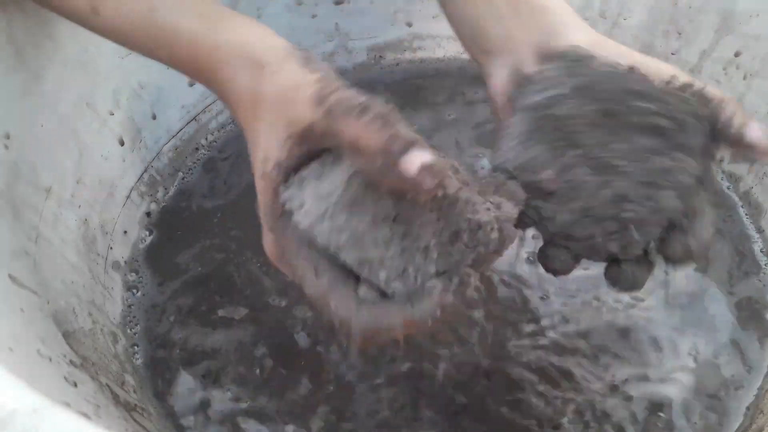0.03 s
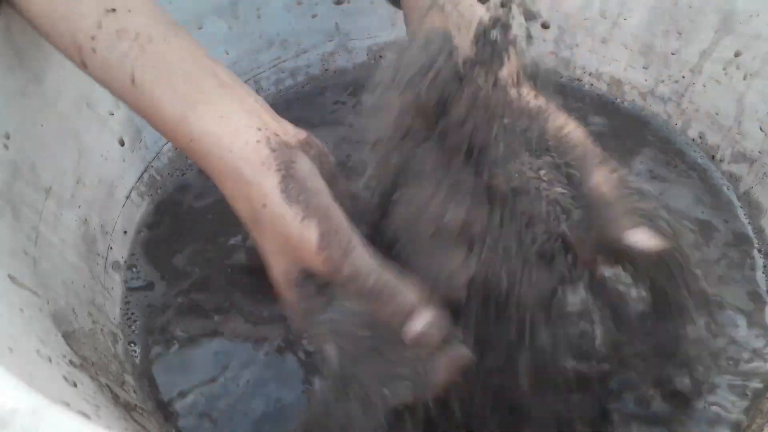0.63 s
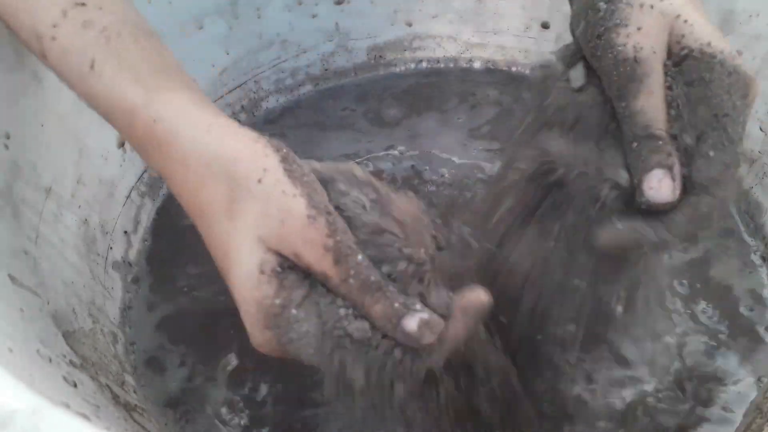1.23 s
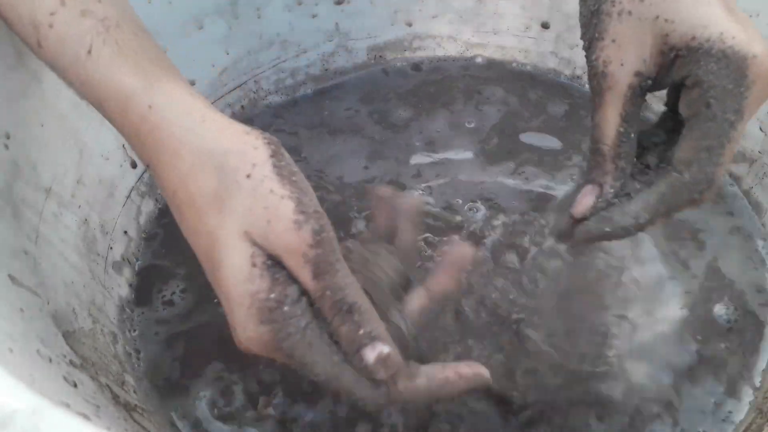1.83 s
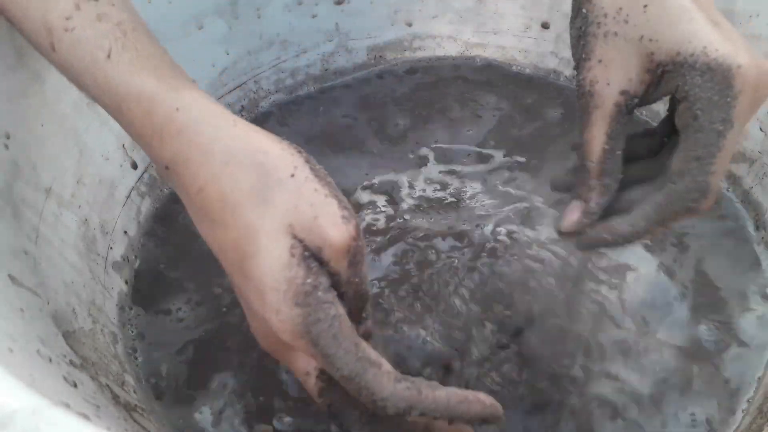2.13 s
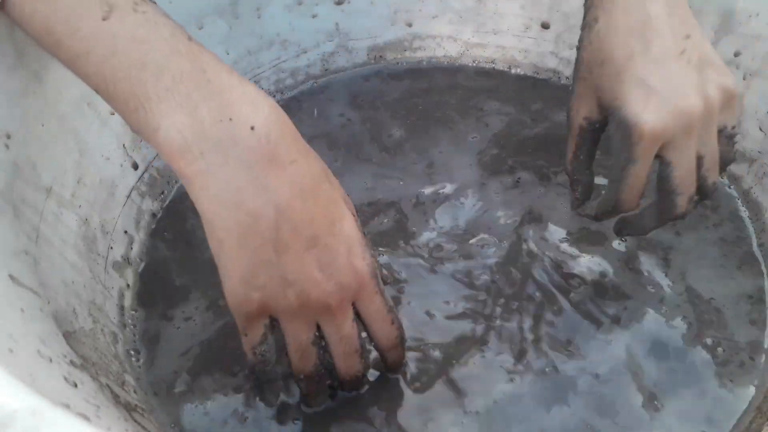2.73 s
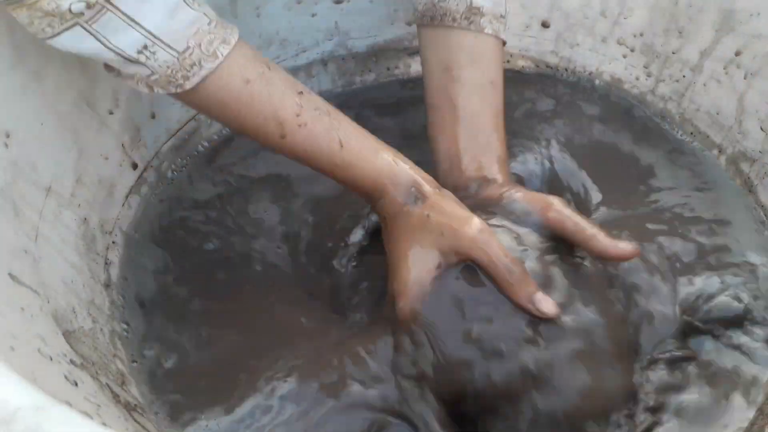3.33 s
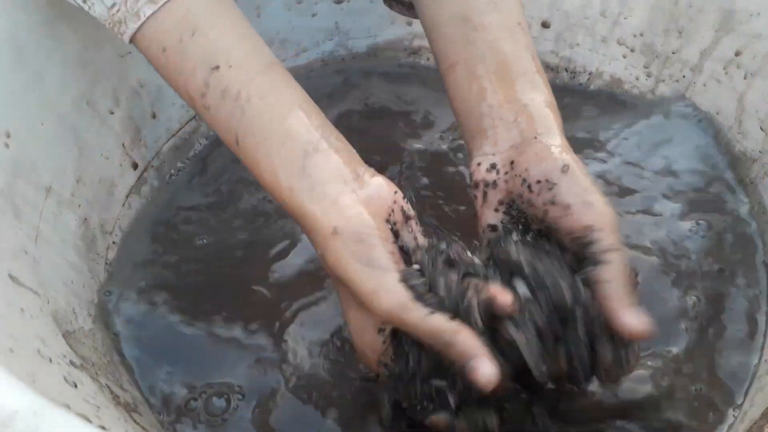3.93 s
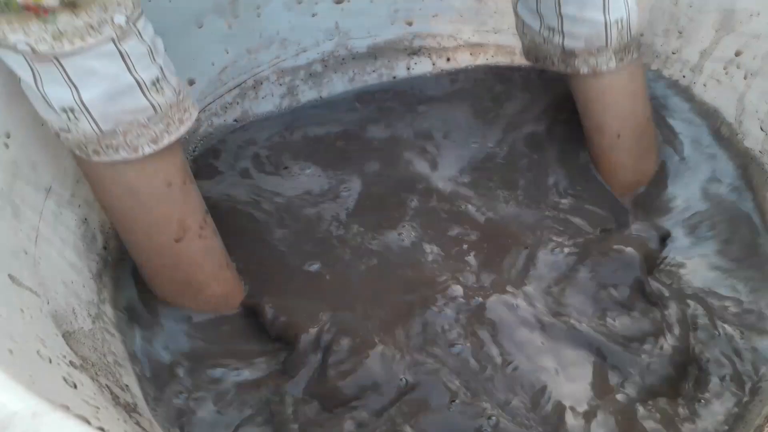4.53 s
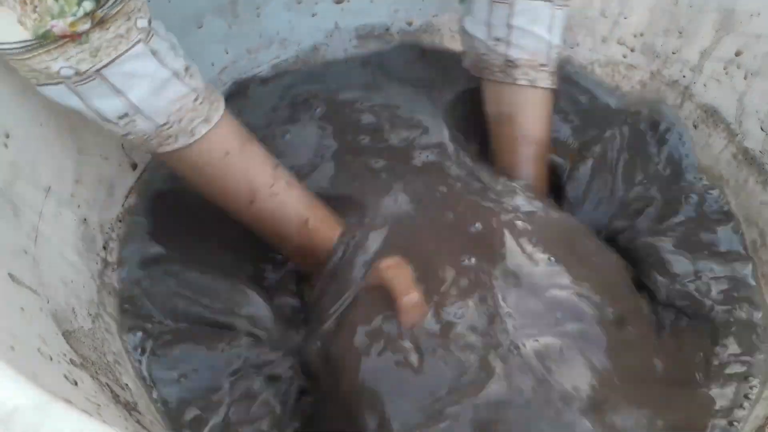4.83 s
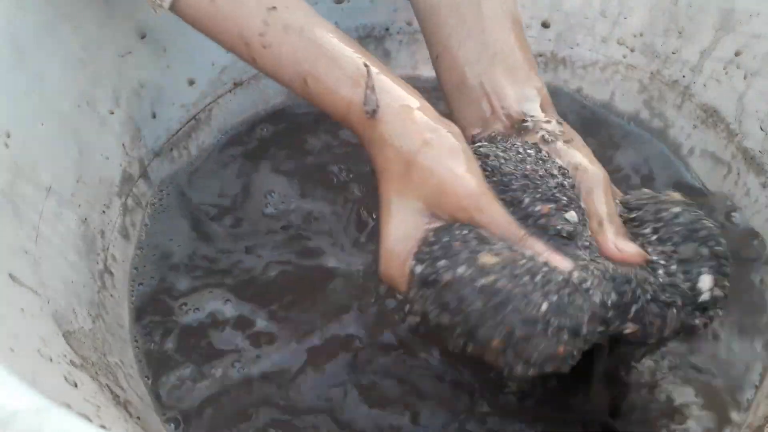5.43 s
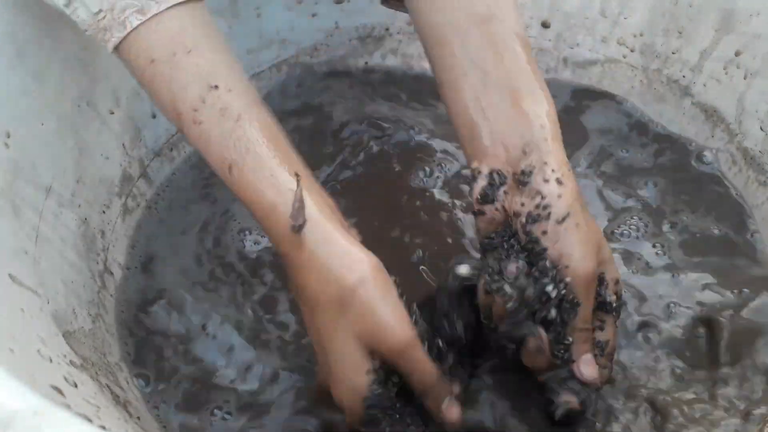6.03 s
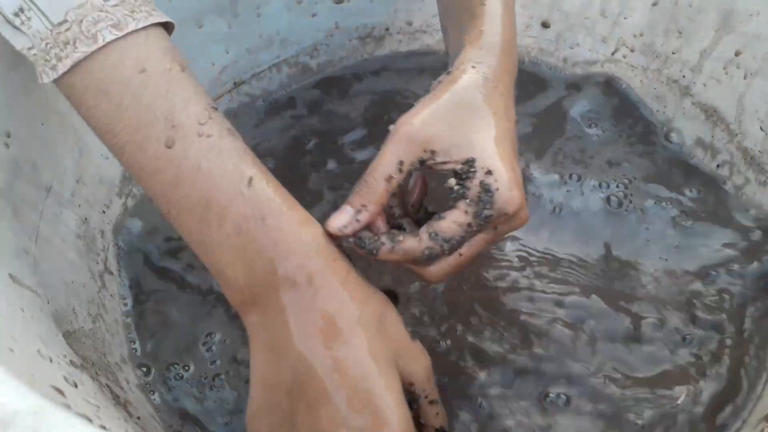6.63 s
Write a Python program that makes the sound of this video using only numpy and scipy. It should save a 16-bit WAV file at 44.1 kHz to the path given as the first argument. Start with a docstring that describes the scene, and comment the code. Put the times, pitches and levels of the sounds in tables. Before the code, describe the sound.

Close up, hands crumble sandy lumps over a tub of water, and the grit pours in with a hiss and a small splash. As the hiss fades, a small bird chirps faintly some way off. The hands then slosh through the water and lift out mud twice, squeezing it so it spits, squelches and drops back in plops. A low outdoor rumble lies underneath.

```python
"""A hiss of grit on water comes first, as hands crumble lumps of sandy ash over a tub.
The hands then scoop up the mud twice and squeeze it: it spits, squelches and drops back in plops
while the water sloshes. Hiss is the sum of many tiny impacts, a snap is a brief broadband impulse,
and a plop is the damped resonance of trapped air.
A small bird sings some way off, over a low outdoor rumble."""
import sys
import numpy as np
from scipy import signal
from scipy.fft import rfft, irfft, next_fast_len
from scipy.io import wavfile
from scipy.ndimage import uniform_filter1d

SR = 44100
rng = np.random.default_rng(int(sys.argv[2]) if len(sys.argv) > 2 else 0)


def store_pcm(level_fs):
    """Save levels as 16-bit WAV."""
    pcm = np.round(np.clip(level_fs, -1, 1) * 32767).astype(np.int16)
    wavfile.write(sys.argv[1], SR, np.atleast_2d(pcm).T)


N = 295029

# sand falling on the water: (time [s], level [dB])
SAND_POUR = [(0.0, -42.5), (0.2, -38), (0.33, -34.5), (0.47, -28.5), (0.66, -31.5), (1.27, -33.5),
             (1.96, -42), (2.3, -42.5), (2.42, -50.5), (2.8, -60)]
# cracking lumps and bursting pockets of mud:
# (time [s], relative crack level [dB], centre frequency [Hz], relative spray level [dB])
SNAPS = [(0.3039, -20, 6700, -28.5), (0.567, -6, 5430, -23.5), (0.6128, -17, 5260, -26.5),
         (0.6644, 6, 6100, -21), (0.8402, -4.5, 2500, -30), (0.868, -27, 5940, -30.5),
         (0.964, -22, 2380, -30), (1.128, -20, 6500, -24.5), (1.2402, -26, 2360, -32.5),
         (1.386, -14, 4900, -30.5), (1.6102, -29, 6130, -28.5), (1.8914, -32, 4740, -32.5),
         (2.1257, -3, 4200, -47), (2.1778, 4, 10900, -54), (2.264, -3.5, 13500, -33),
         (3.267, -21, 7550, -43), (3.418, -9, 2550, -35.5), (3.7718, 3, 6060, -28), (3.785, -8, 2400, -32),
         (3.7963, 12, 4600, -22), (3.8375, -2, 4730, -25.5), (3.8761, 16.5, 6100, -47),
         (3.878, 10, 5400, -46), (3.9037, -19, 4060, -26.5), (3.9436, -26, 3900, -21.5),
         (4.0422, -24, 3000, -31.5), (4.080, -25, 4300, -25.5), (4.1304, -9, 6900, -26.5),
         (4.1494, -1, 4570, -46), (4.158, -17, 4070, -32), (4.175, 9.5, 5140, -29),
         (4.2275, 11.5, 6100, -33), (4.2609, -4, 3660, -25), (4.304, -16, 3800, -29.5),
         (4.354, 0, 2320, -45), (4.3714, -5, 2270, -29), (4.402, 0.5, 4170, -26.5),
         (4.8742, -21, 4230, -30.5), (4.8925, -18, 3020, -32.5), (4.9697, -4.5, 6350, -48),
         (5.054, -9, 11000, -49), (5.0697, -11, 3900, -32), (5.146, -20, 2550, -26.5),
         (5.1538, -8, 3070, -28.5), (5.3619, -13, 2860, -42), (5.4555, -35, 3720, -35.5),
         (5.526, -1, 4740, -28), (5.5404, -8, 4680, -32), (5.5497, -6, 4000, -25.5),
         (5.603, -2, 2800, -20.5), (5.607, 1, 6060, -20.5), (5.6554, -3, 3840, -24.5),
         (5.666, 9, 3130, -19), (5.693, -10, 5530, -15.5), (5.7301, 7, 5340, -28),
         (5.7566, 14.5, 5650, -30), (5.7796, -15, 2960, -24), (5.8639, -2, 5200, -21),
         (5.9418, -12, 4530, -23), (6.0128, -27, 5150, -32), (6.19, -2.5, 4700, -45),
         (6.2286, -13, 3900, -25.5), (6.3064, -30, 7000, -36), (6.4055, -22, 5180, -39.5),
         (6.4972, -38, 2700, -45)]
# large air pockets ringing in the water: (time [s], frequency [Hz], relative level [dB])
PLOPS = [(0.443, 567, -16), (0.466, 1160, -20), (0.563, 2020, -21.5), (0.664, 557, -23), (0.84, 1126, -19),
         (0.872, 1140, -21), (0.96, 860, -24.5), (1.242, 830, -26.5), (1.653, 1600, -25.5),
         (2.334, 970, -31.5), (3.295, 2290, -28), (3.557, 865, -25.5), (3.666, 880, -29),
         (3.784, 2075, -10.5), (3.797, 507, -15.5), (3.924, 2730, -18), (3.93, 640, -22.5),
         (3.948, 524, -24), (3.984, 526, -22.5), (4.038, 895, -23.5), (4.081, 590, -22.5),
         (4.083, 3110, -19), (4.162, 820, -19.5), (4.226, 1280, -20), (4.258, 1390, -22.5),
         (4.354, 2580, -21), (4.37, 1770, -21.5), (4.888, 925, -24), (5.117, 534, -28), (5.196, 1950, -24),
         (5.232, 742, -23), (5.362, 2980, -18.5), (5.313, 1220, -28.5), (5.372, 1310, -28.5),
         (5.606, 570, -12.5), (5.665, 2290, -5.5), (5.667, 593, -17.5), (5.691, 580, -15),
         (5.723, 2000, -14.5), (5.733, 530, -22), (5.783, 673, -24), (5.801, 560, -19.5), (5.866, 527, -28),
         (5.915, 1360, -27), (5.93, 1520, -19.5), (5.942, 926, -21), (6.018, 530, -19),
         (6.075, 1910, -23.5), (6.314, 925, -35), (6.377, 1080, -32)]
# mud lifted out, squeezed and let back in: (time clear of the water [s], rise constant [s],
# time let back [s], decay constant [s], trickle level [dB], squeeze time [s], squeeze level [dB])
SCOOPS = [(3.74, 0.43, 4.38, 0.039, -38, 3.67, -37.5), (4.85, 0.16, 6.23, 0.11, -41.5, 5.67, -30)]
# wet grit forced between the fingers: (peak time [s], duration [s], level [dB])
SQUIRTS = [(3.654, 0.17, -45), (4.03, 0.13, -32), (4.317, 0.024, -27), (4.656, 0.33, -44.5),
           (4.883, 0.02, -30.5), (5.125, 0.055, -34.5), (5.723, 0.11, -28), (6.178, 0.044, -33.5)]
# hands pushing water about: (peak time [s], duration [s], relative level [dB])
HAND_STROKES = [(.3, .16, -41), (.72, 0.44, -38), (3.08, 1, -44), (3.85, 1, -50), (4.8, 0.85, -41.5),
                (5.2, 0.43, -44), (5.71, .22, -37), (6.12, .35, -51.5)]
# dull knocks: (time [s], frequency [Hz], envelope peak [dB])
BUMPS = [(1.124, 91.5, -19.5), (1.183, 278, -20.5), (1.257, 170, -21.5), (1.275, 310, -21.5),
         (1.568, 226, -22.5), (1.686, 115, -19.5), (2.22, 216, -24), (2.484, 130, -12), (2.732, 320, -17.5),
         (2.754, 320, -14.5), (2.835, 207, -23.5)]
# reflections from the tub's wall and the water surface: (delay [s], gain [ratio])
TUB_ECHOES = [(.0014, -0.076), (.0026, -0.13), (.0043, .16), (.0061, -0.0088)]
# the bird's thin glides:
# (time [s], duration [s], start frequency [Hz], end frequency [Hz], relative level [dB])
BIRD_WHISTLES = [(.035, .05, 6100, 5700, -35), (.135, .05, 5600, 5950, -34), (.23, .11, 4900, 5600, -33),
                 (.61, .07, 6500, 5750, -31), (.785, .06, 5200, 5900, -32), (.935, .06, 5300, 5750, -30),
                 (1.24, .07, 4150, 3850, -31), (1.40, .05, 3950, 3750, -32), (1.565, .06, 4100, 3800, -33),
                 (1.745, .055, 3750, 4150, -35), (1.835, .05, 5650, 5500, -35),
                 (2.66, .27, 6620, 7060, -49)]
# one down-slurred chirp: (time from onset [s], frequency [Hz], relative level [dB])
BIRD_CHIRP = [(0, 6300, -14), (.008, 6750, 2), (.016, 6300, 1), (.022, 5500, 1), (.032, 4850, -1),
              (.048, 4100, -11)]
# outdoor rumble, easing unevenly: (time [s], level [dB])
RUMBLE_LEVEL = [(0, -34.5), (1.2, -32.5), (2.2, -32), (3.0, -36.5), (3.6, -34), (4.45, -40), (5.2, -35.5),
                (5.7, -35), (6.1, -40), (6.69, -40)]
# spectral envelopes of the noise sources: (frequency [Hz], relative spectral density [dB])
SAND_SPECTRUM = [(710, -5), (1200, -9), (1270, -8.5), (2770, -4.5), (3850, -1), (5040, -2), (6510, 0),
                 (8330, -5), (9780, -19), (11400, -11.5), (15500, -14)]
MUD_SPECTRUM = [(880, -10), (1500, -1), (2260, -2), (2490, -1), (3250, 1.5), (5090, 3), (5720, 1.5),
                (7980, 1), (9510, -15), (14800, -6), (15500, -15)]
SQUIRT_SPECTRUM = [(2500, 0), (5000, 3.5), (7500, 8), (9500, -12.5), (13000, -0.5), (15500, -12)]
SLOSH_SPECTRUM = [(250, 6), (400, 2), (600, 4), (950, 2), (1500, -5), (2200, -6), (3500, -9)]
PLUNGE_SPECTRUM = [(200, 2), (350, -9), (600, -2.5), (1300, -5.5), (2000, -12), (3500, -10)]
RUMBLE_SPECTRUM = [(32, -19), (55, -41), (98, -1.5), (145, 2), (199, -8.5), (232, -9), (296, -14),
                   (337, -18.5), (431, -22.5), (520, -22), (680, -29.5), (1140, -120)]
BUFFET_SPECTRUM = [(20, -15), (35, -14), (55, 1.5), (75, 3.5), (110, 0.5)]
AIR_SPECTRUM = [(300, 21), (1000, -8), (3000, -47), (7500, 10), (9500, -18), (15500, -13)]


def sand():
    """Shot noise: independent impacts of dry grit on the water sum to a hiss."""
    grit = grains(per_s=1800, low_hz=1300, high_hz=14000, cycles=4, spread_db=5, clump_db=5)
    return level(SAND_POUR) * wash(grit, SAND_SPECTRUM, noise_db=.5)


def snaps(spray_rise_s=.0026, spray_fall_s=.0023):
    """Impulsive rupture: lumps and mud tear with a sizzle, crack for a millisecond and throw spray."""
    lower, highest, t = np.zeros(N), np.zeros(N), np.arange(-512, 1536) / SR
    times, pitches, levels = scatter(per_s=12, low_hz=2500, high_hz=10600, spread_db=3, sand_db=-8.5)
    small_snaps = np.column_stack([times, levels + 18, pitches, levels + 3])
    for s, crack_db, hz, spray_db in np.vstack([SNAPS, small_snaps]):
        noise, flutter = rng.standard_normal((2, len(t)))
        drops = rms_one(band(noise, .67 * hz, 1.297 * hz)) + from_db(-4) * noise
        crack = drops * burst(t, rise_s=.0003, fall_s=.0005)
        crack = 2 * crack / np.linalg.norm(crack)   # equal energy, peaking near 1
        unevenness = from_db(3 * np.tanh(rms_one(uniform_filter1d(flutter, size=50))))
        body = from_db(-2) * rms_one(resonate(noise, hz=1720, width_hz=3000))
        spray = 2 * (drops + body) * unevenness * burst(t, spray_rise_s, spray_fall_s)
        sound = from_db(crack_db - 10.5) * crack + from_db(spray_db - 6) * spray
        add(highest if hz > 9000 else lower, s + t[0], sound)
    return treble_shelf(lower) + highest


def plops(cycles_at_1khz=4.35, swell_cycles=.97, glide=-.062):
    """Damped resonance: air pockets ring briefly in muddy water, gliding as water slaps round them."""
    out, t = np.zeros(N), np.arange(4096) / SR
    times, pitches, levels = scatter(per_s=24, low_hz=552, high_hz=2800, spread_db=4.5, sand_db=-16.5)
    small_plops = np.column_stack([times, pitches, levels + 7])
    for s, hz, db in np.vstack([PLOPS, small_plops]):
        noise = rng.standard_normal(len(t))
        cycles = hz * t
        pitch = hz * (1 + (glide + .04 * noise[0]) * np.tanh(cycles / 4 - 1))
        decay_cycles = cycles_at_1khz * np.sqrt(hz / 1000)
        envelope = (1 - np.exp(-cycles / swell_cycles)) * np.exp(-cycles / decay_cycles)
        slap = from_db(-9.5) * rms_one(resonate(noise, hz, width_hz=hz / 2))
        add(out, s, from_db(db + 3.5) * envelope * (tone(pitch) + slap))
    return out


def mud():
    """Bubble bursting: the mud fizzes in proportion to the water draining through it."""
    fizz = grains(per_s=2000, low_hz=1500, high_hz=14000, cycles=13, spread_db=4.3, clump_db=4.5)
    return drain() * wash(fizz, MUD_SPECTRUM, noise_db=0)


def trickle(emptying_db_per_s=2):
    """Gravity drainage: the flow from the lifted mud decays exponentially as it empties."""
    t, flow = np.arange(N) / SR, 0
    for lifted_s, rise_s, lowered_s, fall_s, db, *_ in SCOOPS:
        emptied_db = emptying_db_per_s * np.clip(t - lifted_s, 0, lowered_s - lifted_s)
        flow += from_db(db - emptied_db) * held(lifted_s, lowered_s, rise_s, fall_s)
    return flow


def drain():
    """Pressure-driven flow: each squeeze adds a gush to the trickle."""
    return trickle() + sum(from_db(db) * held(s, s, rise_s=.06, fall_s=.17) for *_, s, db in SCOOPS)


def squirts():
    """Flow noise: wet grit forced through the fingers hisses in short spurts."""
    return swells(SQUIRTS) * from_db(2.5 * drift(100)) * shaped_noise(SQUIRT_SPECTRUM)


def droplets(per_s=110, low_hz=1100, high_hz=6000, cycles_at_2khz=8.1, glide=.058, candidates=1200):
    """Air entrainment: drops and crumbs trap small bubbles of rising pitch, louder with the flow."""
    out, t = np.zeros(N), np.arange(2048) / SR
    flow = drain() + from_db(-1.5) * level(SAND_POUR)
    for when, chance, pitch, size in rng.random((candidates, 4)):
        if chance < per_s * N / SR / candidates:
            hz = low_hz * (high_hz / low_hz) ** pitch
            cycles = hz * t
            decay_cycles = cycles_at_2khz * np.sqrt(hz / 2000)
            envelope = (1 - np.exp(-cycles / 2)) * np.exp(-cycles / decay_cycles)
            note = np.sin(2 * np.pi * cycles * (1 + glide * np.tanh(cycles / 10)))
            gain = flow[int(when * N)] * from_db(-2 * np.log(.05 + size))
            add(out, when * N / SR, gain * envelope * note)
    return out


def water(lapping_db=-52.5, plunge_db=-27):
    """Bubble resonance: the hands, a plunging lump and constant lapping fold in larger bubbles."""
    bubbles = grains(per_s=450, low_hz=460, high_hz=2800, cycles=23, spread_db=3, clump_db=9.5)
    splash = grains(per_s=1500, low_hz=250, high_hz=2500, cycles=6, spread_db=2, clump_db=2)
    stirring = from_db(-2.5) * (swells(HAND_STROKES) + from_db(lapping_db))
    slosh = stirring * wash(bubbles, SLOSH_SPECTRUM, noise_db=12)
    plunge = from_db(plunge_db) * held(start_s=.425, end_s=.489, rise_s=.01, fall_s=.023)
    return slosh + plunge * wash(splash, PLUNGE_SPECTRUM, noise_db=3)


def bumps(width_cycles=.6):
    """Gaussian pulses: a low tone only a swing or two long is heard as a soft knock."""
    out, t = np.zeros(N), np.arange(-1024, 1024) / SR
    for s, hz, db in BUMPS:
        envelope = from_db(db) * np.exp(-(t * hz / width_cycles) ** 2)
        add(out, s + t[0], -envelope * np.sin(2 * np.pi * hz * t))
    return out


def tub(x):
    """Early reflection: the round wall and water surface return close echoes and a short tail."""
    out = x + from_db(-13) * diffuse(x, t60_s=.06)
    for delay_s, gain in TUB_ECHOES:
        add(out, delay_s, gain * x)
    return out


def bird(first_chirp_s=1.877, chirp_period_s=.1148, chirps=7, growth_db=.73):
    """Frequency modulation: wavering whistles run into buzzy chirps, blurred by the yard's echoes."""
    out, rasp_hz = np.zeros(N), 400 * drift(1100)
    for s, length_s, start_hz, end_hz, db in BIRD_WHISTLES:
        size = int(length_s * SR)
        pitch = np.linspace(start_hz, end_hz, size) + rasp_hz[int(s * SR):][:size] / 10
        add(out, s, from_db(db) * signal.windows.hann(size) * tone(pitch))
    times, contour_hz, contour_db = np.transpose(BIRD_CHIRP)
    t = np.arange(0, times[-1], 1 / SR)
    for k in range(chirps):
        s = first_chirp_s + chirp_period_s * k
        pitch = np.interp(t, times, contour_hz) + rasp_hz[int(s * SR):][:len(t)]
        envelope = from_db(-40.5 + growth_db * k + np.interp(t, times, contour_db))
        add(out, s, envelope * tone(pitch))
    song = out * from_db(2.5 * drift(250))   # the level flutters
    return from_db(-10) * song + from_db(-4.5) * diffuse(song, t60_s=.15)


def outdoors(breeze_db=-40.5, calm_db=-60.5, hiss_db=-60.5):
    """Ambient noise: a low rumble, the pressure fluctuations of puffs of air, and a faint hiss."""
    rumble = level(RUMBLE_LEVEL) * from_db(1.06 * drift(9.2)) * shaped_noise(RUMBLE_SPECTRUM)
    breeze = from_db(breeze_db) * held(start_s=.63, end_s=1.34, rise_s=1.46, fall_s=1.46)
    puffs = (breeze + from_db(calm_db)) * from_db(1.5 * drift(14)) * shaped_noise(BUFFET_SPECTRUM)
    return rumble + puffs + from_db(hiss_db) * shaped_noise(AIR_SPECTRUM)


def grains(per_s, low_hz, high_hz, cycles, spread_db, clump_db, modes=20):
    """Impulse response: random clicks, clumped in level, ring resonators that swell and die; rms 1."""
    clumps_db = clump_db * np.clip(drift(130), -1.3, 1.3)
    sizes_db = spread_db * np.minimum(rng.exponential(1, N), 3)
    clicks = from_db(sizes_db + clumps_db) * rng.choice([-1, 1], N) * (rng.random(N) < per_s / SR)
    struck_mode, out = rng.integers(0, modes, N), 0
    for k, hz in enumerate(np.geomspace(low_hz, high_hz, modes)):
        radius = from_db(-60 * hz / cycles / SR)
        mode = [1, 0, 0, 1, -2 * radius * np.cos(2 * np.pi * hz / SR), radius * radius]
        rings = signal.sosfilt([mode, mode], clicks * (struck_mode == k) + 1e-18)
        out += np.sqrt(hz) * rms_one(np.diff(rings, 2, prepend=[0, 0]))
    return rms_one(out)


def scatter(per_s, low_hz, high_hz, spread_db, sand_db):
    """Random point process: times, frequencies and levels of events scaled by trickle and pour."""
    when, pitch, size = rng.random((400, 3))[:int(per_s * N / SR)].T
    flow = trickle() + from_db(sand_db) * level(SAND_POUR)
    db = 20 * np.log10(flow[(when * N).astype(int)]) + spread_db * (2 * size - 1)
    return when * N / SR, low_hz * (high_hz / low_hz) ** pitch, db


def wash(grain, spectrum, noise_db):
    """Superposition: distinct grains stand over countless finer ones, merged into Gaussian noise."""
    return shaped(grain + from_db(noise_db) * rng.standard_normal(N), spectrum)


def shaped_noise(spectrum):
    """Filtered white noise; rms 1."""
    return shaped(rng.standard_normal(N), spectrum)


def shaped(x, spectrum):
    """Spectral weighting that falls 24 dB per octave past the table's ends; rms 1."""
    points_hz, db = np.transpose(spectrum)
    size = next_fast_len(N, True)
    hz = np.maximum(np.arange(size // 2 + 1) * SR / size, 1)
    octaves_outside = np.abs(np.log2(hz / np.clip(hz, points_hz[0], points_hz[-1])))
    gain = from_db(np.interp(np.log(hz), np.log(points_hz), db) - 24 * octaves_outside)
    return rms_one(irfft(rfft(x, size) * gain, size)[:N])


def diffuse(x, t60_s):
    """Reverberation: convolution with an exponentially dying tail of unit energy."""
    tail = rng.standard_normal(8192) * from_db(-60 * np.arange(8192) / SR / t60_s)
    return signal.fftconvolve(x, tail / np.linalg.norm(tail))[:N]


def treble_shelf(x, edge_hz=8300, treble_db=-2):
    """Treble shelf: the sound is slightly duller above about 8 kHz."""
    low = signal.sosfilt(signal.butter(8, edge_hz, fs=SR, output="sos"), x)
    high = signal.sosfilt(signal.butter(8, edge_hz, "high", fs=SR, output="sos"), x)
    return low + from_db(treble_db) * high


def band(x, low_hz, high_hz):
    """Causal band-pass filtering."""
    return signal.sosfilt(signal.butter(2, [low_hz, high_hz], "band", fs=SR, output="sos"), x + 1e-18)


def resonate(x, hz, width_hz):
    """Two-pole resonance."""
    radius = np.exp(-np.pi * width_hz / SR)
    return signal.lfilter([1, 0, -1], [1, -2 * radius * np.cos(2 * np.pi * hz / SR), radius * radius], x)


def tone(hz):
    """A sinusoid whose phase is the integral of its frequency."""
    return np.sin(2 * np.pi * np.cumsum(hz) / SR)


def drift(knots_per_s):
    """Random modulation, interpolated between values of unit spread."""
    knots = rng.standard_normal(2048)
    return np.interp(np.arange(N) / SR * knots_per_s, np.arange(len(knots)), knots)


def burst(t, rise_s, fall_s):
    """Exponential growth up to t = 0 and decay after it."""
    return np.exp(-np.maximum(t / fall_s, -t / rise_s))


def held(start_s, end_s, rise_s, fall_s):
    """Exponential growth up to start_s, a hold at 1, and decay after end_s."""
    t = np.arange(N) / SR
    return burst(t - np.clip(t, start_s, end_s), rise_s, fall_s)


def swells(rows):
    """A raised-cosine envelope for each (peak time [s], duration [s], level [dB])."""
    out = np.zeros(N)
    for s, length_s, db in rows:
        add(out, s - length_s / 2, from_db(db) * signal.windows.hann(int(length_s * SR)))
    return out


def level(rows):
    """Gain at every sample, interpolated from (time [s], level [dB])."""
    return from_db(np.interp(np.arange(N) / SR, *np.transpose(rows)))


def from_db(db):
    """Decibels to amplitude ratio."""
    return 10 ** (np.asarray(db) / 20)


def rms_one(x):
    """Normalisation to unit rms."""
    return x / np.sqrt(np.mean(x ** 2) + 1e-20)


def add(out, s, sound):
    """Superpose a sound at time s."""
    i = max(0, round(s * SR))
    out[i:i + len(sound)] += sound[:max(0, N - i)]


def scene():
    """Superposition: all sources sum at one point just above the tub."""
    close = tub(treble_shelf(snaps()) + plops() + droplets())
    return (close + sand() + mud() + squirts() + water() + bumps() + bird() + outdoors())[None]


def record(dry, cutoff_hz=15750):
    """Clipping and band limiting: the loudest snaps flatten, then a steep low-pass cuts the top."""
    return signal.sosfilt(signal.ellip(12, .1, 90, cutoff_hz, fs=SR, output="sos"), np.clip(dry, -1, 1))


dry = scene()
out = record(dry)
store_pcm(out)
```